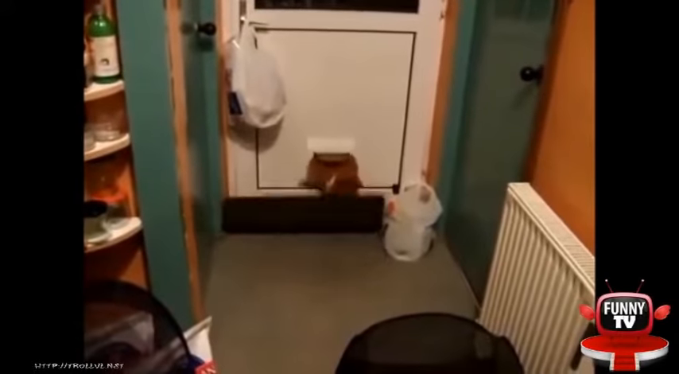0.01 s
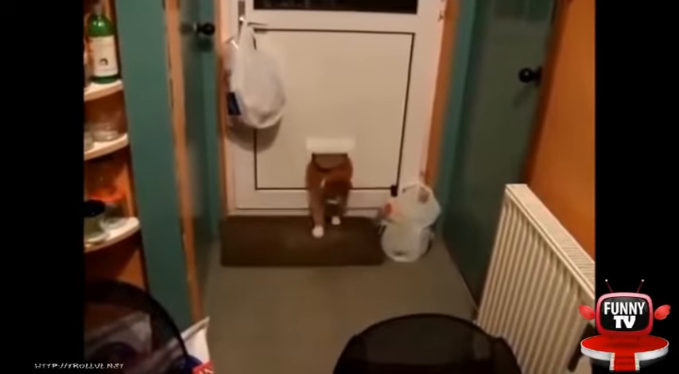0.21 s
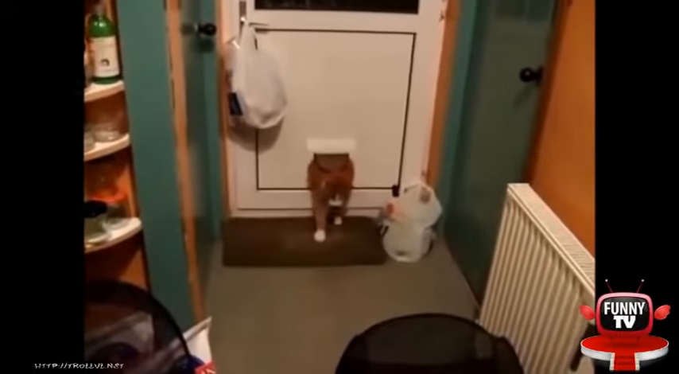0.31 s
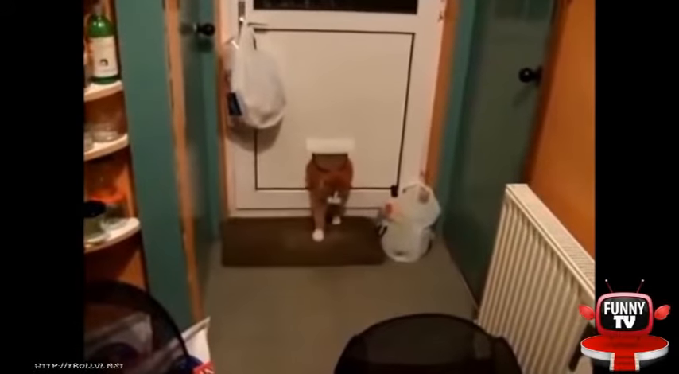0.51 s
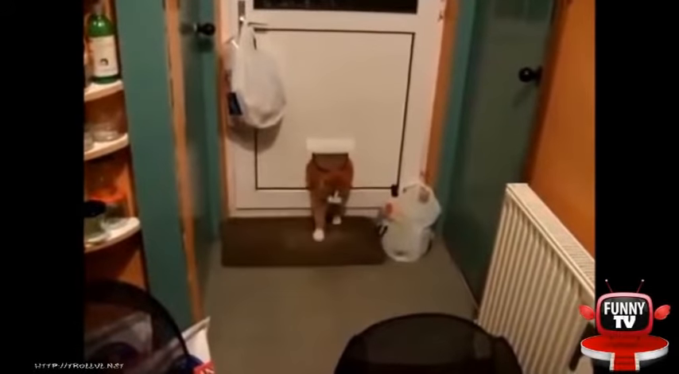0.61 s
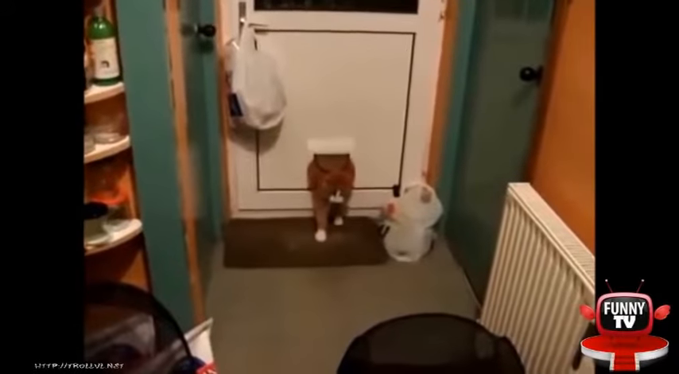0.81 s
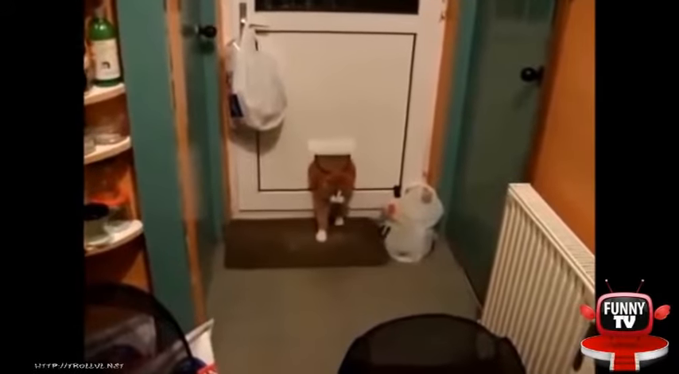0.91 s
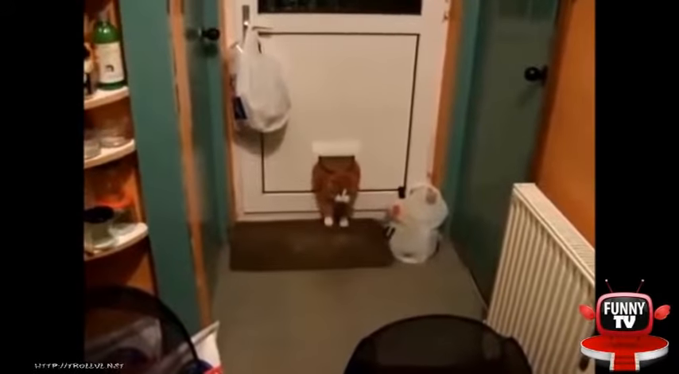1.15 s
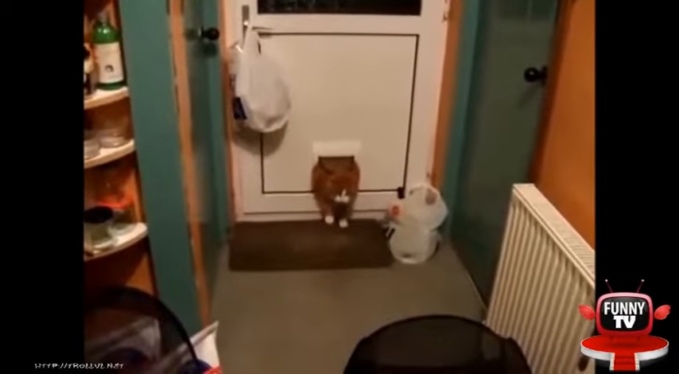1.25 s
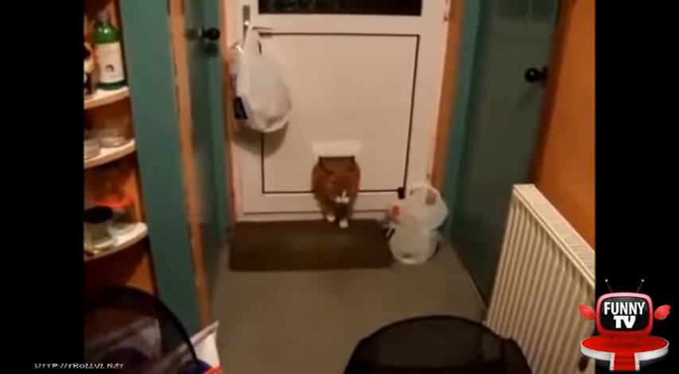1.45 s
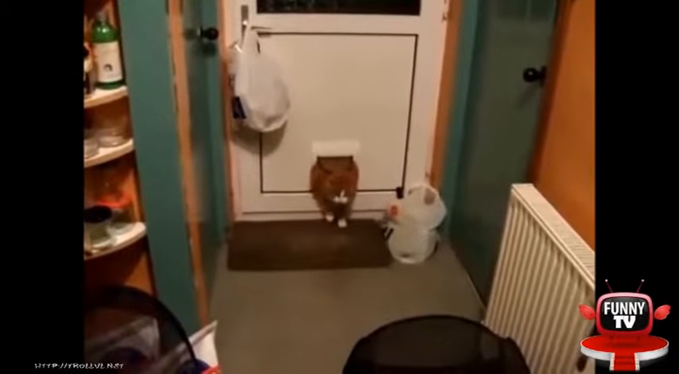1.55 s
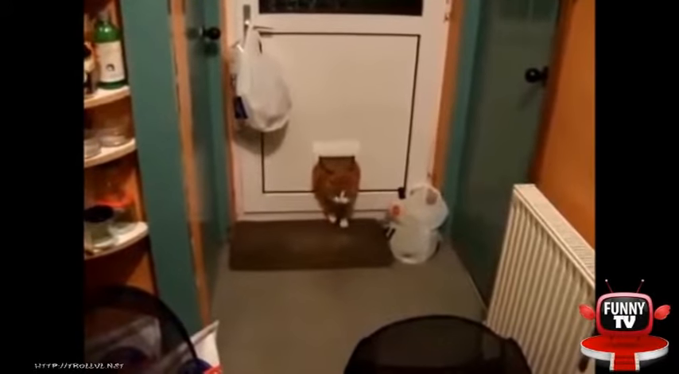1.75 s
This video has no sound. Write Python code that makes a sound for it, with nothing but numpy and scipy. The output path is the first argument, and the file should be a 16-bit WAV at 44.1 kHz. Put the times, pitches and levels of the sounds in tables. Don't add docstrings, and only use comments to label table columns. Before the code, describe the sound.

A cat flap opens and slams in a small hallway. From 0 to 0.45 seconds, fur brushes the plastic frame with faint hinge creaks, tiny squeaks and light knocks. At about 0.47 a loud, bright magnetic snap and hollow door-panel clap ring out, rattling rapidly until 0.67. Quiet hiss and weak hum remain; around 1.2 a faint creak and scuff, then a soft paw thud at 1.34.

```python
import sys
import numpy as np
from scipy import signal
from scipy.fft import rfft, irfft, next_fast_len
from scipy.io import wavfile
from scipy.ndimage import uniform_filter1d, map_coordinates

SR = 44100
rng = np.random.default_rng(int(sys.argv[2]) if len(sys.argv) > 2 else 0)


def gain_from_db(level_db):
    decades = np.asarray(level_db, float) / 20
    return 10 ** decades


def int16_out(signal):
    q = np.round(np.clip(np.atleast_2d(signal).T, -1, 1) * 32767)
    wavfile.write(sys.argv[1], SR, q.astype(np.int16))


N = 79380


def unit(x):
    return x / np.sqrt(np.mean(x ** 2) + 1e-20)


def along(points, hz):
    f, value = np.transpose(points)
    return np.interp(np.log(hz + 1), np.log(f + 1), value)


def curves(rows):
    s, *columns = np.transpose(rows)
    return [np.interp(np.arange(N) / SR, s, column) for column in columns]


def during(rows):
    t = np.arange(N) / SR
    return (t >= rows[0][0]) * (t < rows[-1][0])


def wobble(rate):
    points = rng.standard_normal(int(N * rate / SR) + 4)
    return map_coordinates(points, [np.arange(N) * rate / SR])


def filtered(x, response):
    m = next_fast_len(N + SR // 2)
    return irfft(rfft(x, m) * response(np.fft.rfftfreq(m, 1 / SR)), m)[..., :N]


def low_cut(hz, order):
    return lambda f: (1j * f / (hz + 1j * f)) ** order


def body(peaks):
    def response(f):
        return sum((-1) ** k * gain_from_db(db) * 1j * f * width / (hz * hz - f * f + 1j * f * width)
                   for k, (hz, width, db) in enumerate(peaks))
    return response


def ring(modes, t, scatter_db):
    return -sum(gain_from_db(db + scatter_db * rng.normal() - 60 * t / t60) * np.sin(2 * np.pi * hz * t)
                for hz, db, t60 in modes)


def knocks(rows, modes, puff_db):
    puff_t60 = 0.052
    rings, puffs, t = np.zeros(N + SR), np.zeros(N + SR), np.arange(SR // 2) / SR
    for s, db, ms in rows:
        push = np.exp(-(np.arange(-200, 200) / SR / (ms / 4000)) ** 2 / 2)
        push /= push.sum()
        struck = ring(modes, t, scatter_db=0.76)
        puff = gain_from_db(puff_db - 60 * t / puff_t60) * rng.standard_normal(len(t))
        start = round(s * SR)
        rings[start:][:len(t)] += gain_from_db(db - 12.0) * signal.fftconvolve(struck, push, "same")
        puffs[start:][:len(t)] += gain_from_db(db - 9.5) * signal.fftconvolve(puff, push, "same")
    return filtered(rings[:N], low_cut(85, 4)) + filtered(puffs[:N], low_cut(152, 2))


# [t/s, level/dB, contact/ms]
KNOCKS = [(0.024, -48, 0.16), (.0815, -38, 0.091), (.088, -41, .2), (0.194, -19.5, 2.6), (.204, -49, 1.7),
          (.211, -26, 0.72), (.22, -25.5, 0.63), (.238, -27, 1.6), (.257, -30.5, 1.5), (.268, -23, 0.35),
          (.289, -30.5, 0.38), (.311, -27, 0.55), (0.333, -27.5, 0.19), (0.36, -39, 0.39),
          (.448, -29, 0.84), (0.457, -12, 0.75), (.473, -4, 0.21), (.4775, -6.5, 0.47), (.485, -4.5, 1.13),
          (.498, -10.5, 0.93), (.521, -10, 0.9), (.534, -12.5, 1.24), (.549, -12.5, 1.4),
          (.572, -31.5, 2.9), (.585, -23.5, 1.1), (.599, -24, 1.1), (0.616, -22.5, 1.6), (.633, -38.5, 3.9),
          (0.648, -37, 1.8), (.662, -34, 1.7)]
# [f/Hz, level/dB, t60/s]
PANEL = [(102, -16, 0.055), (143, -2.5, 0.046), (188, 3.5, 0.045), (303, -8.5, 0.085), (339.8, -3, 0.23),
         (375.8, 0.5, 0.16), (431.6, -2.5, 0.13), (536, -1.5, 0.028), (590, -9, 0.016), (686, -28, 0.034),
         (800, -11.5, 0.032), (865, -19, 0.099), (958, -12, 0.072), (1150, -8, 0.021), (1495, 3, 0.015),
         (1950, -21, .02)]


def flap():
    return knocks(KNOCKS, PANEL, puff_db=2.5)


# [t/s, level/dB]
SNAPS = [
    (0.4665, -35),
    (0.4714, -7),
    (0.4733, -5.5),
    (0.4756, -16.5),
]
# [f/Hz, level/dB, t60/s]
CATCH = [(2920, -10.5, 0.024), (3630, -8, 0.014), (4350, -4, 0.021), (6600, -7, 0.0074),
         (7323, 4.5, 0.0097), (8280, -3.5, 0.0087), (11100, -3.5, 0.0044)]


def catch():
    crack_db, crack_t60 = -3, 0.0075
    out, t = np.zeros(N + SR), np.arange(SR // 2) / SR
    for s, db in SNAPS:
        crack = gain_from_db(crack_db - 60 * t / crack_t60) * rng.standard_normal(len(t))
        out[round(s * SR):][:len(t)] += gain_from_db(db - 8) * (ring(CATCH, t, scatter_db=2.5) + crack)
    return out[:N]


def patchy(x):
    patch_db = 3
    z = signal.stft(x, nperseg=512)[2]
    field = uniform_filter1d(uniform_filter1d(rng.standard_normal(z.shape), 5, 0), 4, 1)
    return signal.istft(z * gain_from_db(patch_db * unit(field)), nperseg=512)[1][:N]


# [f/Hz, level/dB]
FUR = [(300, -120), (900, -28), (2000, -2.5), (5000, -0.5), (7500, 0), (10000, -6.5), (15500, -16)]


def fur(rows, frame):
    grains_per_s, grain_db, grain_share = 2500, 3, .6
    drag_db, rumble_db = curves(rows)
    grain_level = gain_from_db(grain_db * np.minimum(rng.exponential(size=N), 3))
    snags = (rng.random(N) < grains_per_s / SR) * grain_level * rng.standard_normal(N)
    rub = grain_share * unit(snags) + rng.standard_normal(N)
    hiss = unit(filtered(patchy(rub), lambda f: gain_from_db(along(FUR, f))))
    hiss *= gain_from_db(drag_db + 0.8 * wobble(40.4) + 0.92 * wobble(219.9))
    rumble = unit(filtered(rng.standard_normal(N), body(frame))) * gain_from_db(rumble_db + 2.4 * wobble(50.27))
    return (hiss + rumble) * during(rows)


# [t/s, fur level/dB, rumble level/dB]
NUDGE = [
    (0, -67, -55),
    (.025, -47, -42),
    (.04, -60, -50),
    (.06, -76, -44.5),
    (.075, -50, -53),
]
DRAG = [
    (.079, -47, -64),
    (.084, -40.5, -70),
    (.15, -31.5, -45.5),
    (.2, -30, -36),
    (.246, -35, -35.5),
    (.266, -30.5, -32),
    (.33, -36, -37.5),
    (.4, -37.5, -48),
    (.464, -31, -37.5),
    (.47, -26, -30),
]
SETTLE = [
    (.47, -27, -14.5),
    (.49, -34.5, -32),
    (.56, -57.5, -35),
    (.6, -51, -44.5),
    (.665, -46.5, -80),
    (.7, -53.5, -80),
    (.78, -97, -84),
]
SCUFF = [
    (1.202, -78, -69),
    (1.207, -65, -46),
    (1.24, -61, -53.5),
    (1.255, -54, -51),
    (1.28, -84, -55),
]
# [f/Hz, width/Hz, level/dB]
EDGE = [(596, 440, 4), (800, 236, 10), (1186, 84, -2), (2330, 940, -2), (3460, 790, -10)]
FRAME = [(156.1, 9.4, -0.5), (333, 84, -0.5), (535, 73, -7.5), (827, 230, -6), (1190, 96, -25)]


def rubbing():
    return fur(NUDGE, EDGE) + fur(DRAG, FRAME) + fur(SETTLE, FRAME) + fur(SCUFF, EDGE)


# [t/s, length/s, f/Hz, level/dB]
SQUEAKS = [(0.088, 0.0085, 640, -31), (0.11, 0.022, 2150, -41), (0.136, 0.043, 1060, -35.5),
           (0.155, 0.035, 590, -39.5), (0.205, 0.03, 318, -28), (0.107, 0.041, 800, -35),
           (0.117, .025, 1160, -40.5), (0.212, 0.02, 1045, -31.5), (0.257, 0.024, 855, -56),
           (0.272, 0.034, 1003, -37.5), (0.294, 0.052, 540, -37), (0.32, 0.031, 842, -32),
           (0.312, 0.024, 2690, -42), (0.352, 0.037, 800, -41), (1.18, 0.039, 686, -52)]


def squeaks():
    t, out = np.arange(N) / SR, np.zeros(N)
    for s, length, hz, db in SQUEAKS:
        swell = np.sin(np.pi * np.clip((t - s) / length, 0, 1))
        turns = hz * np.cumsum(1 + 0.0202 * wobble(61.14)) / SR
        out += gain_from_db(db - 2.0 + 0.87 * wobble(83.4)) * swell * np.sin(2 * np.pi * turns)
    return out


def creak(rows, hinge):
    slip_jitter, scatter_db = .07, 4
    hz, level_db, bright_db = curves(rows)
    turns = np.cumsum(hz) / SR + slip_jitter * wobble(120)
    tone = np.sin(2 * np.pi * turns)
    for k, db in hinge:
        tone += gain_from_db(db + bright_db + scatter_db * wobble(60.96)) * np.sin(2 * np.pi * k * turns)
    return tone * gain_from_db(level_db) * during(rows)


# [t/s, slip rate f/Hz, level/dB, overtone level/dB]
CREAK = [
    (.08, 451, -35.5, -8),
    (.09, 433.3, -47, 5.5),
    (.105, 413, -33, -9),
    (.125, 418, -46.5, -2),
    (.14, 409, -40.5, 3),
    (.158, 382, -47.5, 11),
    (.185, 385, -46, 6),
    (.2, 383, -75, 6),
]
LATE_CREAK = [
    (1.2, 403.7, -73, 7.2),
    (1.207, 398.5, -64, 14),
    (1.235, 425, -61, 11.3),
    (1.255, 434, -54.5, 6.4),
    (1.275, 433, -74, 8),
]
# [multiple of slip rate, level/dB]
HINGE = [(2, -0.5), (3, -7), (4, -23), (5, -27)]
LATE_HINGE = [(2, -0.5), (3, -7.5), (4, -6.5), (5, -26)]


def creaks():
    return creak(CREAK, HINGE) + creak(LATE_CREAK, LATE_HINGE)


# [t/s, level/dB, contact/ms]
PAWS = [
    (1.206, -39, .2),
    (1.3405, -32.5, 0.79),
    (1.344, -19, 1.06),
    (1.35, -28.5, 0.68),
    (1.356, -30.5, 0.45),
    (1.363, -32, 1.8),
    (1.394, -34, 1.04),
]
# [f/Hz, level/dB, t60/s]
BOARDS = [(151, -4, .055), (334, 2, .035), (511, -6, .02), (657, -6, .025), (770, -9, .025),
          (888, -8, .025)]


def paws():
    return knocks(PAWS, BOARDS, puff_db=-6)


# [f/Hz, t60/s]
HALL = [(100, 0.35), (400, 0.56), (2000, 0.29), (10000, 0.41)]


def hall(x):
    hz, t, z = signal.stft(rng.standard_normal(SR // 2), SR, nperseg=256)
    tail = signal.istft(z * gain_from_db(-60 * t / along(HALL, hz)[:, None]), SR, nperseg=256)[1]
    return signal.fftconvolve(np.pad(x, (250, 0)), tail / np.linalg.norm(tail))[:N]


# [f/Hz, level/dB]
HISS = [(25, 6), (200, -13.5), (420, -10), (1000, -13), (3000, -17), (7500, -17), (11000, -26),
        (15800, -35)]
# [f/Hz, width/Hz, level/dB]
AIR = [(132, 94, -12), (362, 77, -7), (288, 97, -16), (805, 290, -20.5)]


def background():
    dip_s, dip_length_s, dip_db = 1.605, 0.0039, -9
    hum_hz, hum_db = 421, -59
    hiss = unit(filtered(rng.standard_normal(N), lambda f: gain_from_db(along(HISS, f))))
    hiss *= gain_from_db(-50 + 0.99 * wobble(13.3))
    hiss *= gain_from_db(dip_db * np.exp(-((np.arange(N) / SR - dip_s) / dip_length_s) ** 2))
    air = unit(filtered(rng.standard_normal(N), body(AIR))) * gain_from_db(-61.5 + 2.1 * wobble(5.87))
    turns = np.cumsum(hum_hz + 2.5 * wobble(10)) / SR
    hum = gain_from_db(hum_db + 2.5 * wobble(9)) * np.sin(2 * np.pi * turns)
    return hiss + air + hum


def blotchy(x, kept, from_hz, size):
    hz, _, z = signal.stft(x, SR, nperseg=2048)
    tiles = rng.random((1024 // size + 1, z.shape[-1])) < kept
    tiles = np.repeat(tiles, size, axis=0)[:len(hz)]
    return signal.istft(z * (tiles | (hz < from_hz)[:, None]), SR, nperseg=2048)[1][..., :N]


# [f/Hz, level/dB]
WIDTH = [(70, -32), (150, -25), (350, -29.5), (700, -20.5), (2400, -13), (4400, -11), (8000, -12.5),
         (15000, -5)]
WIDE_S = [(.06,), (.57,)]


def scene():
    hall_db, lean_db = -13, -0.13
    door = flap() + catch() + rubbing() + squeaks() + creaks() + paws()
    mid = door + gain_from_db(hall_db) * hall(door)
    spread = hall(door) * 0.15 + np.roll(door, 9)
    side = filtered(spread, lambda f: gain_from_db(along(WIDTH, f))) + mid * (gain_from_db(lean_db) - 1)
    side = blotchy(side * during(WIDE_S), kept=.42, from_hz=0, size=40)
    return np.array([mid + side, mid - side]) + background()


def band_limit(x):
    return signal.sosfilt(signal.butter(12, 15880, fs=SR, output="sos"), x)


# [f/Hz, level/dB]
MIC = [(20, -5.5), (100, 5), (8000, -1.5), (9300, -9.5), (12300, -2.5), (13000, -9), (15500, 5)]


def record(dry):
    ceiling, top_hz, offset = .95, 15650, -.0032
    heard = filtered(dry, lambda f: gain_from_db(along(MIC, f)))
    heard = heard / (1 + np.abs(heard / ceiling) ** 4) ** .25
    heard = filtered(heard, lambda f: f < top_hz)
    heard = blotchy(heard, kept=.13, from_hz=12500, size=4)
    return band_limit(heard + offset)


dry = scene()
out = record(dry)
int16_out(out)
```